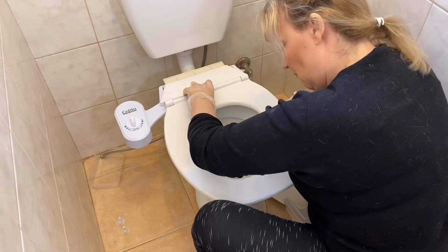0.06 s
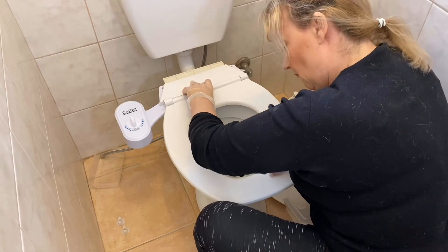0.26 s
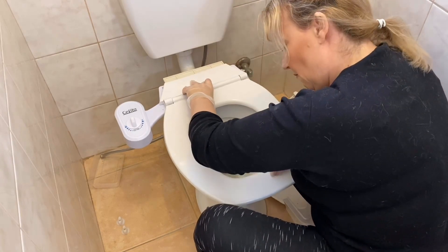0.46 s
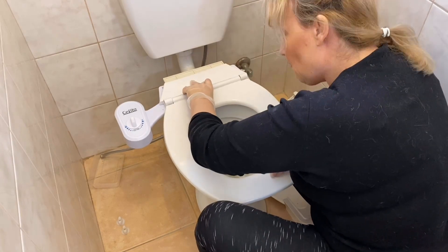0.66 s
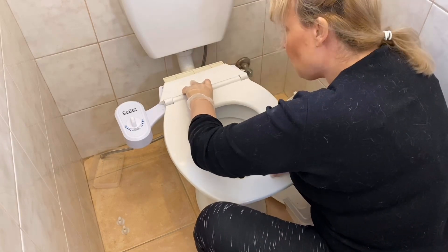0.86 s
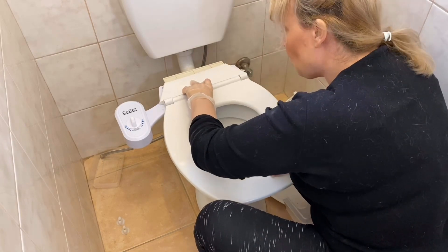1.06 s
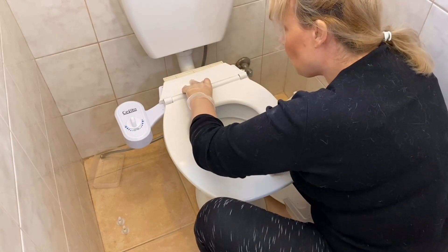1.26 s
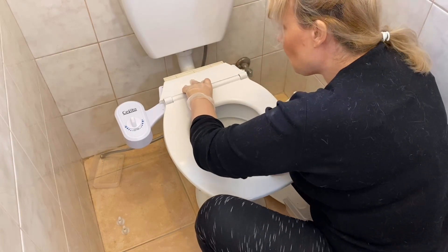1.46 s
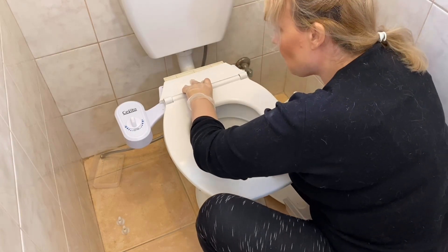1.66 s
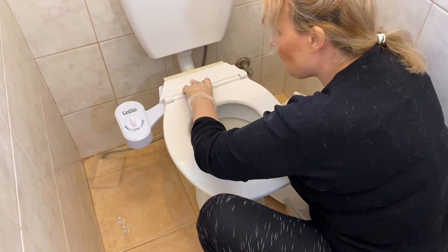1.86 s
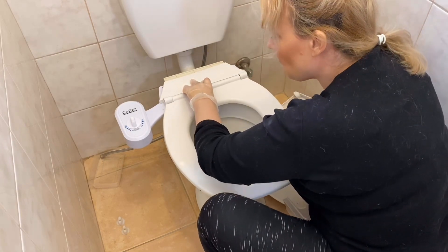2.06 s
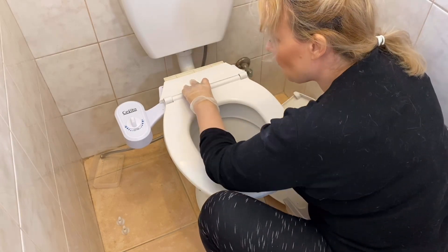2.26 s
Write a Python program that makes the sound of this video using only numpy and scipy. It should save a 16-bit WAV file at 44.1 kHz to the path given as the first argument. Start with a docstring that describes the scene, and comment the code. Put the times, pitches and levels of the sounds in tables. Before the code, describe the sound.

Hard plastic knocks and clicks from a shifted toilet seat, with short bright echo in a small bathroom

```python
"""A plastic toilet seat is shifted by hand in a small tiled bathroom, heard by a pair of microphones: short
rattles of random ticks through plastic resonances, some swelling as slides, and clicks of its stiff attachment.
Soft thumps ring decaying low modes of bowl, seat and floor; a sleeve brushes as grainy shaped noise.
Far birds through a window are swept tones and a pulsed narrow noise, over quiet low house noise and hiss."""
import sys
import numpy as np
from scipy import signal
from scipy.fft import rfft, irfft, next_fast_len
from scipy.io import wavfile
from scipy.ndimage import uniform_filter1d, map_coordinates

SR = 44100
rng = np.random.default_rng(int(sys.argv[2]) if len(sys.argv) > 2 else 0)


def inscribe(sig):
    """Save sig as 16-bit PCM at rate SR to the path in sys.argv[1].

    A 1-D sig is mono; a 2-D sig holds one channel per row.
    Samples are clipped to [-1, 1] before scaling.
    """
    pcm = np.round(np.clip(np.atleast_2d(sig).T, -1, 1) * 32767)
    wavfile.write(sys.argv[1], SR, pcm.astype(np.int16))


def volts_from_decibels(level):
    """Turn decibel levels (scalar or array-like) into linear amplitude factors."""
    exponent = np.asarray(level, float) / 20
    return 10 ** exponent


N = 101429  # length [samples]


def along(points, hz):
    """Interpolate (frequency, value) points on a log-frequency axis."""
    f, v = np.transpose(points)
    return np.interp(np.log(hz + 1), np.log(f + 1), v)


def filtered(x, response):
    """Shape the spectrum of x by a complex response of frequency."""
    n = x.shape[-1]
    size = next_fast_len(n + 8192)
    spectrum = rfft(x, size) * response(np.fft.rfftfreq(size, 1 / SR))
    return irfft(spectrum, size)[..., :n]


def unit(x):
    """Scale to rms 1."""
    return x / np.sqrt(np.mean(x ** 2) + 1e-20)


def resonance(f, hz, width):
    """Response of one damped causal mode, with gain 1 at its centre."""
    return 1j * f * width / (hz * hz - f * f + 1j * f * width + 1e-9)


def add(track, s, sound):
    """Mix a sound into the track at time s, cut at the track's end."""
    part = track[:, round(s * SR):round(s * SR) + sound.shape[1]]
    part += sound[:, :part.shape[1]]


# likeness of the two microphones: (frequency [Hz], left-right correlation [-1 to 1])
LIKENESS = [(30, .995), (150, .98), (380, .72), (800, -.15), (1400, -.1), (3000, .2), (6500, .15),
            (15000, .3)]


def microphone_pair(pair):
    """Mix two unrelated signals so that left and right are alike in the bass and differ higher up."""
    def angle(hz):
        return np.arccos(np.clip(along(LIKENESS, hz), -1, 1)) / 2

    mid, side = filtered(pair, lambda hz: np.array([np.cos(angle(hz)), np.sin(angle(hz))]))
    return np.array([mid + side, mid - side])


# decay of the tiled bathroom: (frequency [Hz], time to fall 60 dB [s])
TILED_DECAY = [(100, 0.67), (500, 0.39), (1500, 0.39), (4000, 0.34), (8000, 0.29), (14000, 0.22)]


def room(pair, wet_db, feed=None):
    """Add a diffuse tail of random noise in which each frequency dies at its own speed."""
    rise_s = 0.0033
    hz, t, z = signal.stft(rng.standard_normal((2, SR)), SR, nperseg=256)
    fading = z * volts_from_decibels(-60 * t / along(TILED_DECAY, hz)[:, None])
    tail = signal.istft(fading, SR, nperseg=256)[1][:, :SR]
    tail = tail * (1 - np.exp(-np.arange(SR) / SR / rise_s))
    source = pair[:1] if feed is None else feed
    wet = signal.fftconvolve(source, tail / np.linalg.norm(tail[0]), axes=1)
    return np.pad(pair, ((0, 0), (0, SR - 1))) + volts_from_decibels(wet_db) * wet


# level of the low house noise before its random drift: (time [s], level [dB])
HOUSE_LEVEL = [(0, -73), (0.499, -65.5), (.85, -66), (.92, -71.5), (1.2, -64), (1.398, -66), (1.55, -72),
               (1.7, -70), (1.9, -67.5), (2.3, -64)]
# spectrum shape of the house noise: (frequency [Hz], relative density [dB per Hz])
HOUSE_COLOUR = [(15, -41), (30, -5), (46, -2), (140, -9), (400, -26), (800, -27.5), (1100, -41.5),
                (2000, -61)]
# spectrum shape of the steady hiss: (frequency [Hz], relative density [dB per Hz])
HISS_COLOUR = [(500, -21.5), (1000, 5.5), (3000, -2.5), (6000, -4), (12000, -25.5), (16000, -37.5)]


def quiet_floor():
    """Low house noise with a drifting level, over a faint steady hiss; both are filtered white noise."""
    hiss_db = -89
    t = np.arange(N) / SR
    drift = map_coordinates(rng.standard_normal(30), [np.arange(N) * 10 / SR])  # ten random points a second
    level_db = np.interp(t, *np.transpose(HOUSE_LEVEL)) + 0.54 * drift

    def noise(colour):
        white = rng.standard_normal((2, N))
        return unit(microphone_pair(filtered(white, lambda f: volts_from_decibels(along(colour, f)))))

    return volts_from_decibels(level_db) * noise(HOUSE_COLOUR) + volts_from_decibels(hiss_db) * noise(HISS_COLOUR)


# falling chirps of one far bird: (time [s], start frequency [Hz], end frequency [Hz], level before the room [dB])
FAR_CHIRPS = [(.58, 3700, 3300, -78), (.64, 3700, 3300, -78), (1.285, 3720, 3250, -79),
              (1.375, 3720, 3250, -80), (1.465, 3720, 3250, -82), (1.54, 3720, 3250, -82),
              (1.615, 3600, 3300, -87), (1.665, 3720, 3300, -84), (2.13, 3700, 3400, -84)]
# a second far bird: (start [s], end [s], centre [Hz], width [Hz], level before pulsing and room [dB], notes [per s])
FAR_WARBLE = (1.78, 2.2, 2330, 120, -85, 17)


def far_birds():
    """Falling tones of one far bird and pulsed narrow noise for another, both blurred by the room."""
    chirp_s, room_db = .042, -1.5
    song, t = np.zeros(N), np.arange(round(chirp_s * SR)) / SR
    for s, high, low, db in FAR_CHIRPS:
        cycles = (high + (low - high) * t / chirp_s / 2) * t
        chirp = np.sqrt(np.hanning(len(t))) * np.sin(2 * np.pi * cycles)
        song[round(s * SR):][:len(t)] += volts_from_decibels(db) * chirp
    start, end, hz, width, db, rate = FAR_WARBLE
    t = np.arange(N) / SR
    notes = (t > start) * (t < end) * (0.23 + np.sin(np.pi * rate * t) ** 2)
    narrow = unit(filtered(rng.standard_normal(N), lambda f: resonance(f, hz, width) ** 2))
    song = song + volts_from_decibels(db) * notes * narrow
    return room(np.array([song, 0.75 * song]), room_db)[:, :N]


# sleeve strokes: (start [s], fall time [s], level [dB], spectral tilt [dB per octave])
SLEEVE_STROKES = [(0, 0.21, -72, 4), (0.455, 0.1, -67.5, -0.5), (0.564, 0.12, -68, -2),
                  (0.727, 0.095, -73, -1.5), (2, 0.4, -73.5, -0.5), (2.072, 0.085, -68.5, -1.5),
                  (2.208, .2, -68.5, 0)]
# spectrum shape of brushed cloth: (frequency [Hz], relative density [dB per Hz])
CLOTH_COLOUR = [(200, -29), (400, -1), (1200, -9.5), (2800, -12.5), (8000, -24), (15500, -34)]


def sleeve():
    """Cloth brushing: noise whose strength flutters grain by grain, under soft strokes."""
    t, out = np.arange(N) / SR, 0
    for s, fall_s, db, tilt_db in SLEEVE_STROKES:
        rise = np.clip((t - s) / .006, 0, 1)
        shape = volts_from_decibels(db) * rise * np.exp(-np.clip((t - s) / fall_s, 0, 9) ** 3)
        grain = volts_from_decibels(2 * unit(uniform_filter1d(rng.standard_normal(N), 200)))

        def colour(f):
            return volts_from_decibels(along(CLOTH_COLOUR, f) + tilt_db * np.log2(f / 1000 + .1))

        brushing = filtered(grain * rng.standard_normal((2, N)), colour)
        out = out + shape * unit(microphone_pair(brushing))
    return out


# soft pushes on the seat:
# (time [s], bowl drive [relative dB], seat flex drive [relative dB], floor boom drive [relative dB], rise [s])
SOFT_PUSHES = [(0.083, -44, -44.5, -52.5, 0.0063), (.11, -64, -42.5, -50, 0.0046),
               (.226, -18.5, -24.5, -48, 0.0088), (0.302, -58.5, -45, -45.5, 0.0083),
               (0.468, -62.5, -65, -50.5, 0.01), (0.579, -49.5, -53.5, -54, 0.011),
               (0.626, -41.5, -61, -67.5, 0.0078), (.67, -45.5, -63, -54.5, 0.0085),
               (.75, -57, -66, -63.5, 0.009), (0.822, -67, -72.5, -60, 0.012),
               (1.039, -45.5, -61, -70, 0.0082), (1.082, -61, -49, -49, 0.01),
               (1.279, -59.5, -76, -63, 0.011), (1.73, -49, -58, -72, .012),
               (2.011, -70, -69.5, -62.5, 0.014), (2.1, -60, -63, -54, 0.024),
               (2.23, -49.5, -61.5, -70, 0.0083), (2.27, -45.5, -63, -67, 0.0058)]
# low modes of the bowl: (frequency [Hz], relative level before random variation [dB], time to fall 60 dB [s])
BOWL_MODES = [(141.3, -2, 0.16), (120.96, -17, 0.13), (171.5, -6, 0.098), (219.4, -20, 0.085)]
# flexing modes of the seat: (frequency [Hz], relative level before random variation [dB], time to fall 60 dB [s])
FLEX_MODES = [(272.2, -2.5, 0.18), (281.4, -13.5, 0.6), (347, -17, .2), (395, -10.5, 0.18)]
# floor boom modes: (frequency [Hz], relative level before random variation [dB], time to fall 60 dB [s])
BOOM_MODES = [(51.7, -5.5, 0.68), (63, 3.5, 0.13), (74, -11, 0.34)]


def thumps():
    """A soft push swells the low modes of bowl, seat and floor, which then ring out as decaying sines."""
    room_db = -14
    out, t = np.zeros((2, N)), np.arange(SR) / SR

    def ring(modes):
        return sum(volts_from_decibels(db + rng.normal(0, 2.2) - 60 * t / t60) * np.sin(2 * np.pi * hz * t)
                   for hz, db, t60 in modes)

    for s, bowl_db, flex_db, boom_db, rise in SOFT_PUSHES:
        low = volts_from_decibels(bowl_db) * ring(BOWL_MODES) + volts_from_decibels(flex_db) * ring(FLEX_MODES) + volts_from_decibels(boom_db) * ring(BOOM_MODES)
        low = low * (1 - np.exp(-(t / rise) ** 2)) * 2
        pair = np.array([low, np.roll(low, 60)])  # the second signal lags by 60 samples
        add(out, s, microphone_pair(room(pair, room_db)))
    return out


# treble of every seat contact: (frequency [Hz], relative gain [dB])
CONTACT_TREBLE = [(7800, 3.5), (8500, -9.5), (9200, 4.5), (11900, 1), (12500, -25.5), (13900, -30),
                  (14400, 2), (15400, 1)]


def contact(length, ring_hz, ring_db, tilt_db, modes, rise_share):
    """A dying rattle of tiny random ticks drives the body's resonances and the tiled room."""
    ticks_per_s, tick_spread_db, ring_q = 6000, 3, 9
    body_db, low_cut_hz, room_db = -2.5, 350, 2
    t = np.arange(SR // 10) / SR
    struck = rng.random(len(t)) < ticks_per_s / SR
    ticks = struck * volts_from_decibels(tick_spread_db * rng.standard_normal(len(t)))
    rise = np.minimum(t / (rise_share * length), 1)
    fall = np.exp(-(np.maximum(t / length - rise_share, 0) / (1.05 - rise_share)) ** 2)
    rattle = rise * fall * (ticks + 0.13) * rng.standard_normal((2, len(t)))  # 0.13: noise between ticks
    # the walls answer the contact as one blow
    blow = signal.unit_impulse(len(t), round(rise_share * length * SR))

    def response(f):
        low_cut = (1j * f / (low_cut_hz + 1j * f)) ** 2
        tilt = tilt_db * np.log2(np.maximum(f, 1000) / 1000)
        slope = volts_from_decibels(along(CONTACT_TREBLE, f) + tilt) * low_cut
        body = volts_from_decibels(body_db) * sum(volts_from_decibels(db) * resonance(f, hz, width) for hz, width, db in modes)
        own_ring = volts_from_decibels(ring_db) * resonance(f, ring_hz, ring_hz / ring_q)
        return slope * (1 + body + own_ring)

    sound = filtered(np.vstack([rattle, blow]), response)
    heard = room(unit(sound[:2]), room_db, feed=unit(sound[2:]))
    return microphone_pair(np.sqrt(10 * length) * heard)  # the dry rattle has rms 1 over its length


# knocks of the seat: (time [s], level before room and balance [dB], rattle length [s],
# own ring [Hz], its gain [dB], tilt above 1 kHz [dB per octave])
SEAT_KNOCKS = [(0.0752, -40, .018, 713, 22, -3.5), (0.2187, -21.5, 0.0072, 1310, 2.5, -4.5),
               (1.33, -74, 0.029, 1580, 9.5, -12.5), (1.378, -67, .04, 871, 10, -11.5),
               (1.722, -51, 0.00823, 1537, 20.5, -8), (1.742, -57, 0.0047, 1250, 8.5, -8.5),
               (1.723, -59.5, 0.0069, 3830, 26.5, -11), (2.217, -63, 0.02, 1350, 8, -12.5),
               (2.245, -61, 0.041, 1080, -5, -10.5), (2.277, -60, 0.036, 1270, 25, -3)]
# swelling slides of the seat leading into a knock or click, same columns
SEAT_SLIDES = [(.201, -39, 0.0098, 3466, 16, -10.5), (1.022, -54.5, 0.0351, 859, 1.2, -8)]
# clicks of the stiff attachment, same columns
ATTACHMENT_CLICKS = [(1.050, -39.5, 0.00965, 1506, 4.1, -4), (1.092, -33.5, .0045, 1800, 5, -3.5),
                     (1.099, -49.5, 0.0085, 1134, 2.7, -9.5)]
# resonances of the plastic seat: (frequency [Hz], width [Hz], relative gain [dB])
PLASTIC_MODES = [(554, 26, 10.5), (1126, 41, 9.5), (1270, 50, 3.5), (1427, 60, 9), (1766, 60, 7),
                 (1984, 20, 2), (2173, 50, 1.5), (2618, 20, 1), (3370, 120, -2.5), (4280, 67, 0.5),
                 (5770, 67, 8), (6290, 83, 5.5), (7110, 58, 7), (8040, 100, 4)]
# resonances of the stiff attachment: (frequency [Hz], width [Hz], relative gain [dB])
ATTACHMENT_MODES = [(735, 32, 15), (893, 41, 3.5), (1170, 78, 12), (1322, 97, 9), (1716, 62, 8.5),
                    (1890, 46, 5.5), (2220, 150, 10.5), (3850, 280, 11), (6380, 49, 19), (9480, 200, -22)]


def seat():
    """Knocks and clicks start fast and die; slides swell over their whole length and stop."""
    quick, swelling = 0.11, 1  # rise as a share of the rattle length
    balance_db = 0.93  # left is raised and right lowered by this
    out = np.zeros((2, N))
    for rows, modes, rise_share in ((SEAT_KNOCKS, PLASTIC_MODES, quick),
                                    (SEAT_SLIDES, PLASTIC_MODES, swelling),
                                    (ATTACHMENT_CLICKS, ATTACHMENT_MODES, quick)):
        for s, db, length, ring_hz, ring_db, tilt_db in rows:
            add(out, s, volts_from_decibels(db) * contact(length, ring_hz, ring_db, tilt_db, modes, rise_share))
    return out * volts_from_decibels([[balance_db], [-balance_db]])


def scene():
    """All sources in the bathroom, from the quiet floor to the seat."""
    return quiet_floor() + far_birds() + sleeve() + thumps() + seat()


# frequency response of the microphones: (frequency [Hz], gain [dB])
MICROPHONE_RESPONSE = [(15, -14), (35, 2), (15800, 5), (16300, -8.5), (17000, -63.5)]


def microphone_response(dry):
    """The microphones lose the deepest bass and roll off steeply at the top end."""
    return filtered(dry, lambda f: volts_from_decibels(along(MICROPHONE_RESPONSE, f)))


def top_cut(x):
    """Nothing passes above the cut-off."""
    return signal.sosfilt(signal.butter(12, 16990, fs=SR, output="sos"), x)


def record(dry):
    """The scene as the microphones pass it on."""
    mix = microphone_response(dry)
    return top_cut(mix)


dry = scene()
out = record(dry)
inscribe(out)
```